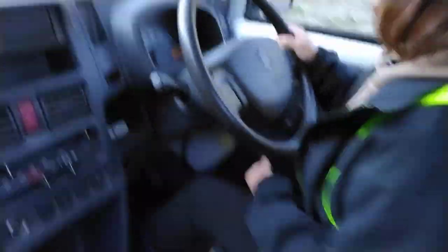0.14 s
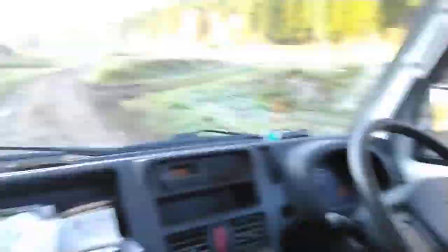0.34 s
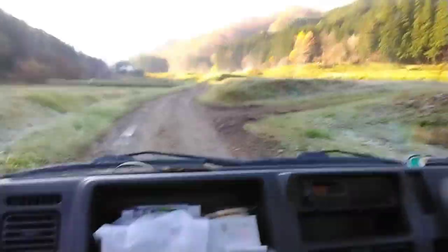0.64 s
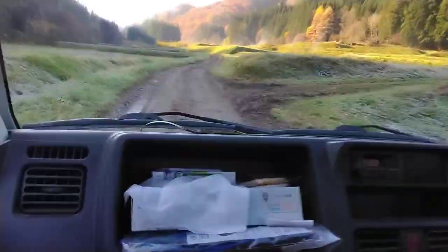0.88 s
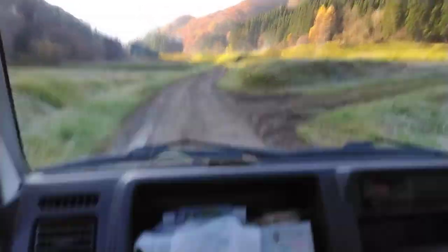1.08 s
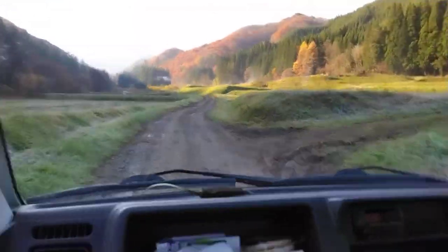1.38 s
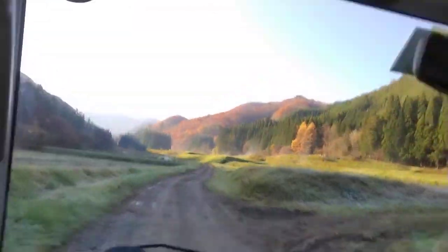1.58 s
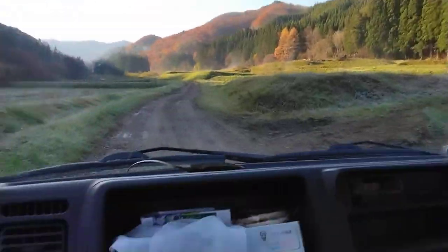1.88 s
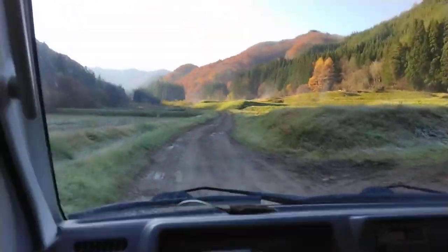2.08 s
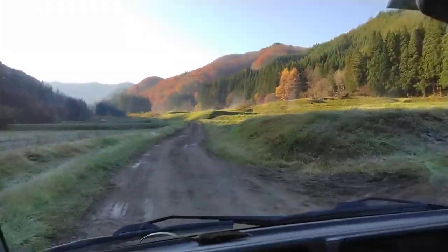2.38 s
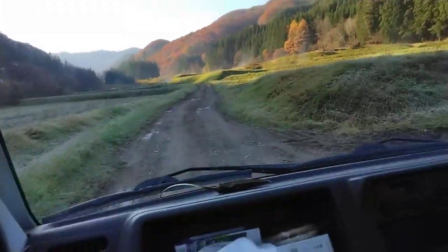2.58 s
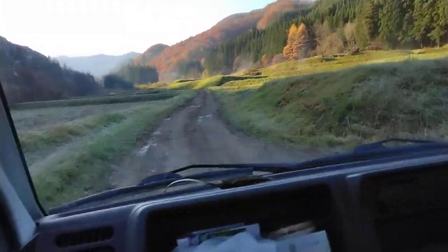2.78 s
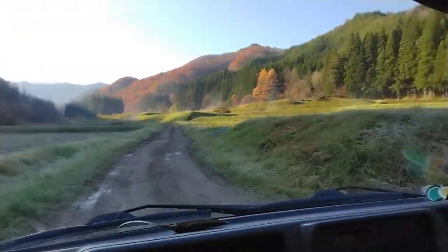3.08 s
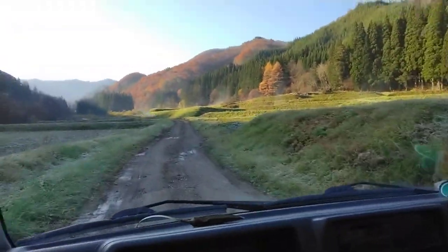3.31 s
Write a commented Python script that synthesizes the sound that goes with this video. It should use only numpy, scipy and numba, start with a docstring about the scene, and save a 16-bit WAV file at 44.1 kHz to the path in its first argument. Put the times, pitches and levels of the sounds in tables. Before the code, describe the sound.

Inside a small truck, heavy low engine rumble throbs over gravel with bumps and gritty ticks

```python
"""Engine boom and cab shake open loud, with a jacket rustling, in a small truck on a rough dirt track.
Wandering sines and shaped noise make the bass; noise and random clicks make the tyres, wind, gravel and cloth.
Decaying noise bursts make dashboard bumps and grit ticks on the left; sliding noise bands knock on the right.
A faint thin tone whistles now and then. The passenger's phone limits it all, so road noise, gravel and
rattles swell up whenever the boom lets go."""
import sys
import numpy as np
from scipy import signal
from scipy.fft import rfft, irfft
from scipy.io import wavfile
from scipy.ndimage import uniform_filter1d, minimum_filter1d
from numba import njit

SR = 44100
rng = np.random.default_rng(int(sys.argv[2]) if len(sys.argv) > 2 else 0)


def put_to_file(sound):
    """Save the sound as 16-bit audio at rate SR, in the file named by the first command-line argument."""
    columns = np.atleast_2d(sound).T  # one column per channel
    safe = np.clip(columns, -1, 1)
    whole_steps = np.round(safe * 32767)
    wavfile.write(sys.argv[1], SR, whole_steps.astype(np.int16))


N = 152145
TIME_S = np.arange(N) / SR
FREQ_HZ = np.maximum(np.fft.rfftfreq(N, 1 / SR), 1)


def undb(db):
    """Amplitude factor of a level in dB."""
    return 10 ** (np.asarray(db) / 20)


def level(x, rms_db):
    """Scale the whole signal to an RMS level."""
    return x * undb(rms_db) / np.sqrt(np.mean(x ** 2))


def curve(table, col=1):
    """A table column interpolated over time."""
    return np.interp(TIME_S, [row[0] for row in table], [row[col] for row in table])


def over_hz(table):
    """A table's second column interpolated over log frequency."""
    table_hz = np.maximum([row[0] for row in table], 1)
    return np.interp(np.log(FREQ_HZ), np.log(table_hz), [row[1] for row in table])


def colour(x, table):
    """Shape by a spectrum; nothing at or below its first frequency."""
    return irfft(rfft(x) * undb(over_hz(table)) * (FREQ_HZ > table[0][0]), N)


def walk(rate_hz):
    """Random levels held 1 / rate_hz seconds and smoothed twice; standard deviation 1."""
    k = int(SR / rate_hz)
    steps = np.repeat(rng.standard_normal(N // k + 1), k)
    smooth = uniform_filter1d(uniform_filter1d(steps, k), k)[:N]
    return smooth / np.std(smooth)


def ring(x, hz, width_hz):
    """One resonance."""
    return signal.lfilter(*signal.iirpeak(hz, hz / width_hz, fs=SR), x)


def pan(left_over_right_db):
    """Left and right gains, half the difference on each."""
    return undb(np.array([[left_over_right_db], [-left_over_right_db]]) / 2)


# Likeness of left and right. Each row: frequency in Hz, correlation from -1 to 1.
LIKENESS = [(60, 0.9), (130, 0.98), (290, 0.79), (640, 0.65), (1410, -.3), (3100, 0.07), (6820, 0),
            (15000, 0)]
# Balance of the ports. Each row: frequency in Hz, left over right in dB.
LEAN = [(100, -.3), (250, 1.5), (700, -.5), (1290, -.5), (2000, -8.5), (2900, -8), (4400, -3), (7000, 2),
        (8300, 7), (11000, 0), (15000, -1)]


def pair(a, b):
    """Two microphone ports: alike in the bass, unrelated in the treble, each with its own lean."""
    likeness = np.clip(over_hz(LIKENESS), -1, 1)
    mid = rfft(a) * np.sqrt((1 + likeness) / 2)
    side = rfft(b) * np.sqrt((1 - likeness) / 2)
    lean = undb(over_hz(LEAN) / 2)
    return irfft(np.array([(mid + side) * lean, (mid - side) / lean]), N)


def grains(rate_hz, spread_db):
    """Scattered clicks, a few much larger than the rest."""
    chance, size = rng.random((2, N))
    sizes = undb(-spread_db * np.log(1 - size))
    return (chance < rate_hz / SR) * sizes * rng.standard_normal(N)


# Cab shake. Each row: time in seconds, centre pitch in Hz, relative level in dB.
SHAKE = [(0.0, 17.5, -5.5), (0.31, 19.5, -13.5), (1.69, 19.8, -13), (1.84, 16.1, -18), (2.78, 20, -13.5),
         (3.45, 20.9, -11)]
# Engine boom. Each row: time in seconds, centre pitch in Hz, relative level in dB.
BOOM = [(0.0, 40.03, 2.5), (0.14, 39.3, -17), (0.3, 50.05, -14.5), (0.52, 47.64, -16), (1.15, 54.28, -16.5),
        (1.58, 43.68, -18.5), (1.81, 42.84, -13), (3.01, 47.14, -15), (3.11, 43.96, -13), (3.45, 48.9, -20)]
# Broad bass drone spectrum. Each row: frequency in Hz, relative density in dB.
DRONE = [(12, -54), (20, 1), (54, -2), (86, -13.5), (118, -11), (174, -24), (300, -33), (390, -40.5),
         (660, -120)]
# Track jolts. Each row: time in seconds, gain on all the bass in dB.
JOLT = [(0, -2.5), (.02, 9), (.08, 13.5), (.17, 8), (.22, 4.5), (.27, 10), (.32, -0.5), (.35, 5),
        (.43, 5.5), (.53, 6), (.56, 0.5), (.59, 7.5), (.72, 7.5), (.77, -1.5), (.81, 4), (.9, 6.5),
        (1.04, 8), (1.085, -2), (1.13, 8), (1.29, 8), (1.335, -1.5), (1.36, 10), (1.385, 4.5), (1.66, 5),
        (1.69, 10), (1.73, -1), (1.77, 4.5), (1.85, 6.5), (1.89, 3.5), (1.92, 9.5), (1.97, 7.5), (2.04, 3),
        (2.1, 0), (2.15, 8.5), (2.185, 3.5), (2.22, 6.5), (2.25, 5.5), (2.29, 8.5), (2.44, 9.5),
        (2.55, 4.5), (2.6, 9.5), (2.625, -7), (2.64, 10.5), (2.66, -1), (2.7, 4), (2.85, 7.5), (2.88, 7.5),
        (2.9, 7), (3.0, 9.5), (3.15, 9.5), (3.23, 2.5), (3.3, 10), (3.45, 7)]
DRONE_DB, BASS_SIDE_DB = -17, -28  # drone relative to the tones, side relative to mid
WANDER_SHARE, WANDER_RATE_HZ, THROB_DB = .16, 20, 3.5
STEADY_S = 0.056  # averaging span that evens the bass before the jolts


def wandering_tone(table):
    """A cab resonance as a sine whose pitch wanders and level throbs at random."""
    amplitude = np.sqrt(2) * undb(curve(table, col=2) + THROB_DB * walk(WANDER_RATE_HZ))
    pitch_hz = curve(table) * (1 + WANDER_SHARE * walk(WANDER_RATE_HZ))
    return amplitude * np.sin(2 * np.pi * (rng.random() + np.cumsum(pitch_hz) / SR))


def drone(rms_db):
    """Broad low noise."""
    return level(colour(rng.standard_normal(N), DRONE), rms_db)


def bass():
    """Two cab resonances over a broad drone, evened in level, then pushed by the jolts."""
    mid = wandering_tone(SHAKE) + wandering_tone(BOOM) + drone(DRONE_DB)
    span = int(STEADY_S * SR)
    local_rms = np.sqrt(uniform_filter1d(uniform_filter1d(mid ** 2, span), span))
    mid = mid * mid.std() / local_rms
    side = drone(BASS_SIDE_DB + 10 * np.log10(np.mean(mid ** 2)))
    return np.array([mid + side, mid - side]) * undb(curve(JOLT))


# Road noise spectrum. Each row: frequency in Hz, relative density in dB.
ROAD = [(88, -31), (150, -4.5), (175, -0.5), (221, -12.5), (354, -11.5), (500, -16), (1050, -22.5),
        (1820, -27), (2480, -24.5), (5310, -32.5), (6710, -29), (7600, -25), (8310, -19.5), (9000, -27.5),
        (9900, -34.5), (15800, -46)]
ROAD_DB, FLICKER_DB, FLICKER_RATE_HZ = -24.5, 0.5, 19
GRAVEL_DB, GRAVEL_RATE_HZ, GRAVEL_SPREAD_DB = -14, 650, 3  # level relative to the hiss, before colouring


def road_source():
    """Tyre and wind hiss plus gravel clicks under the floor."""
    gravel = level(grains(GRAVEL_RATE_HZ, GRAVEL_SPREAD_DB), GRAVEL_DB)
    return colour(rng.standard_normal(N) + gravel, ROAD)


def road():
    """Road noise at two ports; each octave band flickers in level on its own."""
    spectrum = rfft(level(pair(road_source(), road_source()), ROAD_DB))
    out = np.zeros((2, N))
    for low_hz in 125 * 2. ** np.arange(8):
        band = irfft(spectrum * (FREQ_HZ >= low_hz) * (FREQ_HZ < 2 * low_hz), N)
        out += band * undb(FLICKER_DB * walk(FLICKER_RATE_HZ))
    return out


# Cloth spectrum. Each row: frequency in Hz, relative density in dB.
CLOTH = [(2000, -19.5), (3300, -11), (4600, -8), (5800, -7.5), (7000, -3.5), (8100, 0.5), (10700, -19.5),
         (14000, -26)]
# Jacket rustle. Each row: time in seconds, level in dB.
RUSTLE = [(0, -20), (.06, -18.5), (.12, -29), (.2, -27.5), (.26, -28), (.32, -24), (.36, -31), (.39, -18),
          (.43, -21), (.46, -30), (.52, -40)]
# Squeak resonances. Each row: frequency in Hz, width in Hz, relative level in dB.
SQUEAK_MODES = [(3060, 60, -4), (4080, 30, -3), (4330, 30, 0), (5210, 35, 0), (5800, 35, -3)]
# Squeak loudness. Each row: time in seconds, gain in dB.
SQUEAK_LEVEL = [(0, -60), (.2, -48), (.24, -43), (.33, -34), (.36, -45), (.52, -70)]


def rub():
    """Cloth friction as hiss and dense crackle."""
    crackle = level(grains(3000, 2), -4)
    return colour(rng.standard_normal(N) + crackle, CLOTH)


def rustle():
    """Rubbing cloth with a brief thin squeak of noise through narrow resonances."""
    cloth = level(pair(rub(), rub()), 0) * undb(curve(RUSTLE))
    noise = rng.standard_normal((2, N))
    squeak = sum(level(ring(noise, hz, width_hz), db) for hz, width_hz, db in SQUEAK_MODES)
    squeak = squeak * undb(curve(SQUEAK_LEVEL))
    return (cloth + squeak) * (TIME_S < RUSTLE[-1][0])


def burst(start_s, db, decay_s):
    """Envelope with a sudden start and exponential decay."""
    return undb(db) * (TIME_S >= start_s) * np.exp(-np.clip(TIME_S - start_s, 0, 1) / decay_s)


# Dashboard bumps. Each row: start in seconds, level before smoothing in dB, decay time in seconds.
BUMPS = [(.56, -26, 0.029), (.645, -26, 0.0073), (.801, -23, 0.0081), (1.082, -18, 0.014),
         (1.335, -40, 0.044), (1.725, -24, 0.012), (2.25, -22, 0.0083)]
# Dashboard resonances. Each row: frequency in Hz, width in Hz, relative level in dB.
BUMP_MODES = [(330, 440, 9.5), (690, 540, 2), (2430, 1800, -1.5)]


def rattle():
    """Short noisy shakes through the dashboard's resonances."""
    envelope = sum(burst(*row) for row in BUMPS)
    noise = rng.standard_normal(N)
    modes = [level(ring(ring(noise, hz, width_hz), hz, width_hz), db) for hz, width_hz, db in BUMP_MODES]
    return uniform_filter1d(envelope, size=80) * level(sum(modes), 0)


def bumps():
    """Dashboard thuds spread over both ports."""
    return pair(rattle(), rattle())


# Grit ticks. Each row: start in seconds, strike level before the resonances in dB.
TICKS = [(0.566, -19.5), (0.606, -24), (0.8937, -23), (0.9738, -20.5), (1.141, -18), (1.2014, -23),
         (1.3287, -18.5), (1.5352, -24), (1.6191, -22), (1.6662, -25), (1.743, -18.5), (2.0972, -22),
         (2.181, -22.5), (2.2409, -18.5), (2.3123, -16.5), (2.3869, -19), (2.4602, -22), (2.539, -26),
         (2.5696, -25), (2.621, -21), (2.6544, -22), (2.6812, -22.5), (2.8594, -25), (2.893, -16.5)]
TICK_HZ, TICK_WIDTH_HZ, TICK_DECAY_S = 8270, 1100, .0025
TICK_SNAP_DB, TICK_AIR_DB = 20, -9
LEFT_PAN_DB = 5.5  # left over right


def ticks():
    """Grit strikes: a bright spit that rings the microphone port."""
    envelope = sum(burst(start_s, db, TICK_DECAY_S) for start_s, db in TICKS)
    spit = envelope * np.sign(rng.standard_normal((2, N)))
    snap = np.diff(envelope, prepend=0).clip(0) * undb(TICK_SNAP_DB)
    strike = spit + snap
    air = ring(strike, 9900, 6000)
    port = ring(ring(strike, TICK_HZ, TICK_WIDTH_HZ), TICK_HZ, TICK_WIDTH_HZ)
    port = port * np.sqrt(SR / np.pi / TICK_WIDTH_HZ)  # offsets the narrow filter's loss
    return (port + undb(TICK_AIR_DB) * air) * pan(LEFT_PAN_DB)


def swell(start_s, length_s):
    """A quick rise, a hold and a quick fall; also the progress from 0 to 1."""
    u = (TIME_S - start_s) / length_s
    return np.clip(4 * np.minimum(u, 1 - u), 0, 1), np.clip(u, 0, 1)


# Loose plastic. Each row: start in seconds, RMS level of the hold before panning in dB,
# length in seconds, first ring in Hz, last ring in Hz.
KNOCKS = [(.876, -27, .02, 1700, 2200), (1.865, -31, .016, 2900, 2400), (1.888, -23, .026, 2900, 1600)]
KNOCK_PAN_DB = -8.5  # left over right
KNOCK_LOWPASS_HZ = 800  # half-width of the ring


def knock(start_s, db, length_s, from_hz, to_hz):
    """A short scraping clack: low noise shifted up to a broad ring that slides in pitch."""
    envelope, progress = swell(start_s, length_s)
    phase = 2 * np.pi * np.cumsum(from_hz + (to_hz - from_hz) * progress) / SR
    lowpass = signal.butter(2, KNOCK_LOWPASS_HZ, fs=SR)
    a, b = signal.lfilter(*lowpass, rng.standard_normal((2, N)))
    return envelope * level(a * np.cos(phase) + b * np.sin(phase), db)


def knocks():
    """Loose plastic clacks, stronger on the right."""
    return sum(knock(*row) for row in KNOCKS) * pan(KNOCK_PAN_DB)


# Thin whistle. Each row: start in seconds, RMS level of the hold before panning in dB, length in seconds.
WHISTLE = [(1.42, -54, .085), (1.525, -51, .07), (1.7, -50, .09), (2.785, -47, .045)]
WHISTLE_HZ = 9880


def whistle():
    """A near-steady high sine, stronger on the left."""
    envelope = sum(undb(db) * swell(start_s, length_s)[0] for start_s, db, length_s in WHISTLE)
    pitch_hz = WHISTLE_HZ * (1 + .001 * walk(60))
    tone = np.sqrt(2) * np.sin(2 * np.pi * np.cumsum(pitch_hz) / SR)
    return envelope * tone * pan(LEFT_PAN_DB)


def scene():
    """All sources in the cab, summed in stereo."""
    return bass() + road() + rustle() + bumps() + ticks() + knocks() + whistle()


@njit
def hold(x, release):
    """Peak follower that sinks slowly."""
    peak, out = 0., np.empty(len(x))
    for i in range(len(x)):
        peak = max(x[i], peak * release)
        out[i] = peak
    return out


LIMIT, RELEASE_S, ATTACK_S = 0.57, 0.029, 0.0034  # limit in amplitude, before the filters
LOW_CUT_HZ, TOP_HZ = 11.7, 15930


def record(dry):
    """A fast look-ahead limiter shared by both channels, then cuts of the deepest bass and the top."""
    peak = hold(np.abs(dry).max(axis=0), np.exp(-1 / (RELEASE_S * SR)))
    gain = np.minimum(1, LIMIT / (peak + 1e-9))
    k = int(ATTACK_S * SR)
    gain = uniform_filter1d(minimum_filter1d(gain, k), k)
    out = signal.lfilter(*signal.butter(1, LOW_CUT_HZ, "high", fs=SR), dry * gain)
    out = out * np.clip((N - np.arange(N)) / 200, 0, 1)  # fade over the last 200 samples
    return signal.sosfilt(signal.ellip(16, .2, 80, TOP_HZ, fs=SR, output="sos"), out)


dry = scene()
out = record(dry)
put_to_file(out)
```